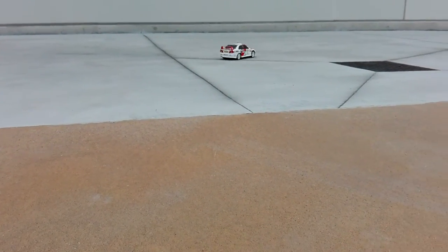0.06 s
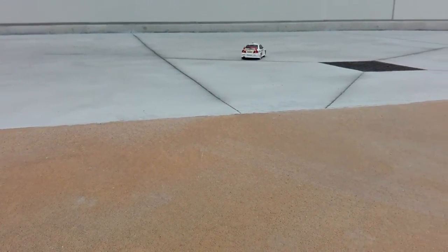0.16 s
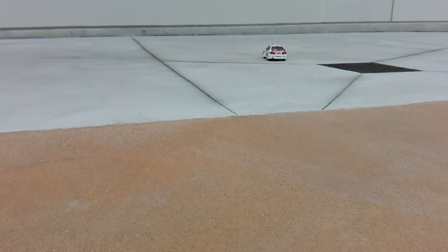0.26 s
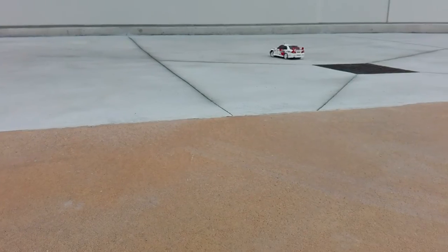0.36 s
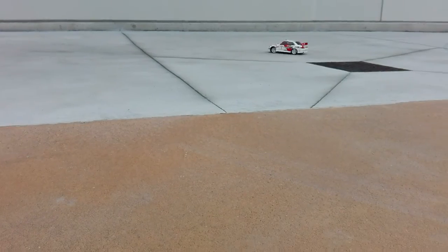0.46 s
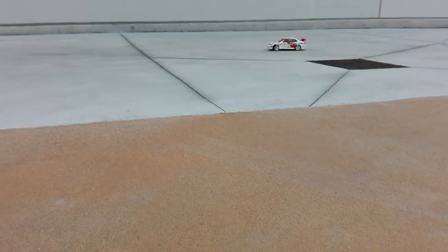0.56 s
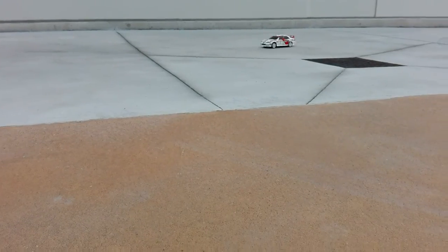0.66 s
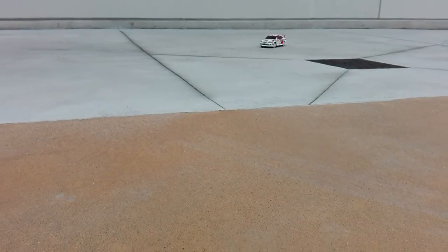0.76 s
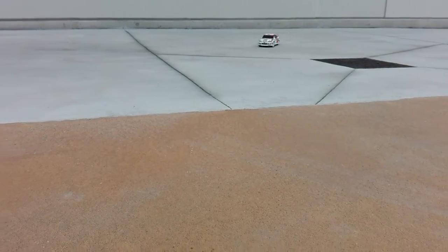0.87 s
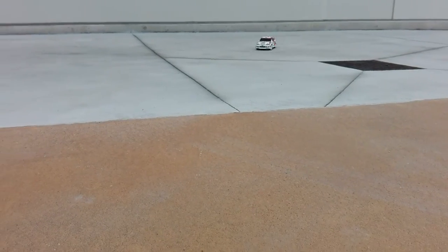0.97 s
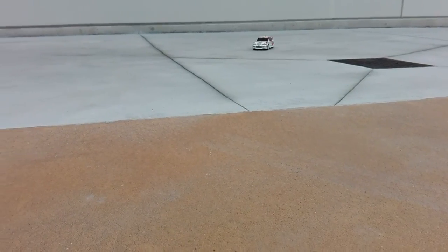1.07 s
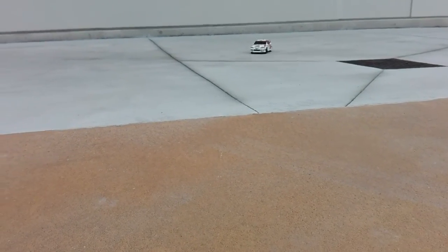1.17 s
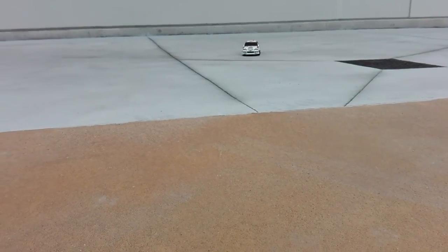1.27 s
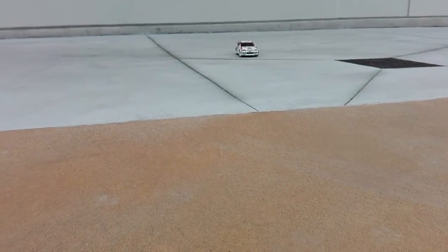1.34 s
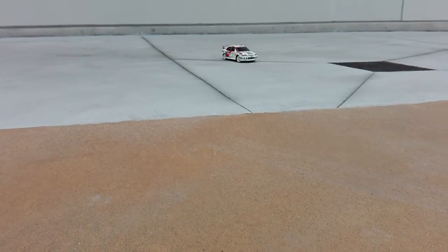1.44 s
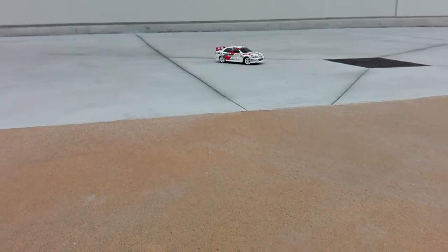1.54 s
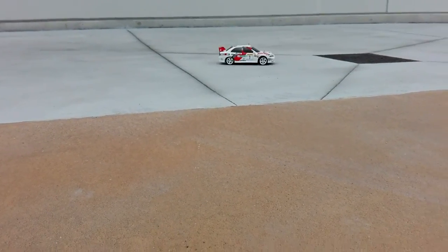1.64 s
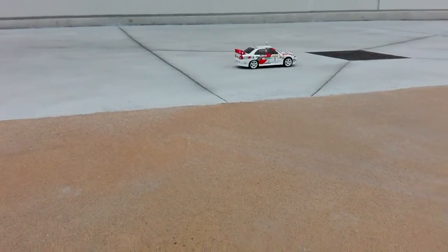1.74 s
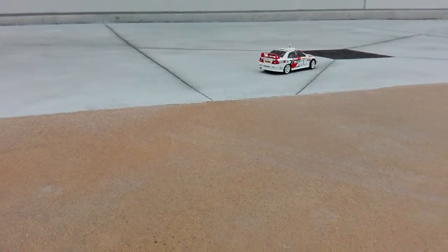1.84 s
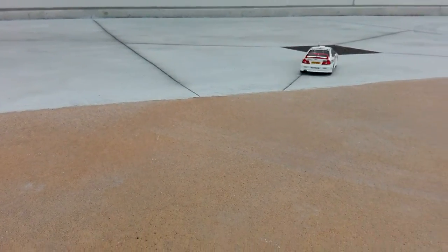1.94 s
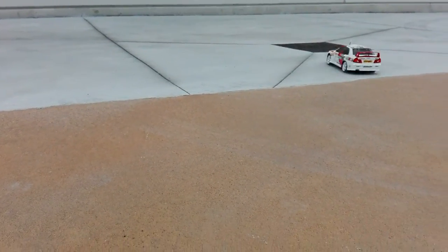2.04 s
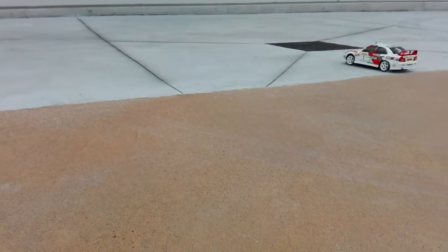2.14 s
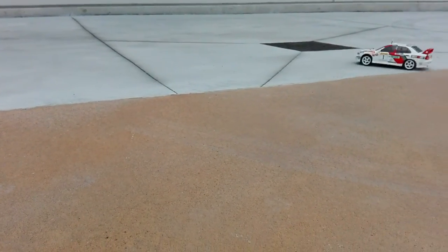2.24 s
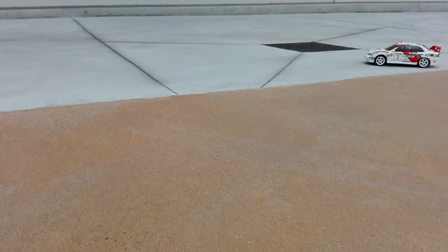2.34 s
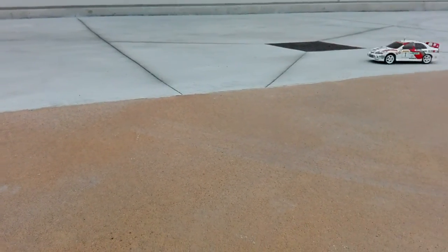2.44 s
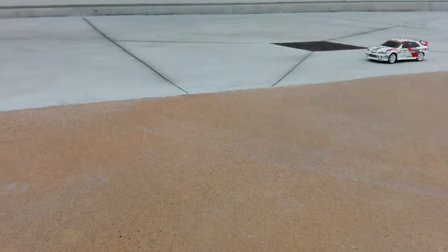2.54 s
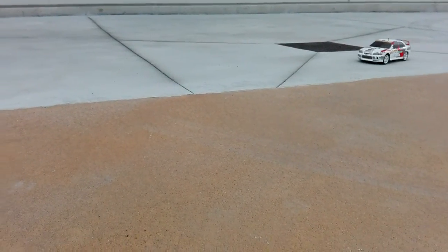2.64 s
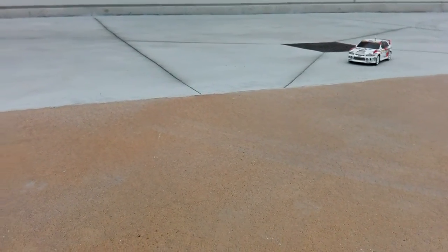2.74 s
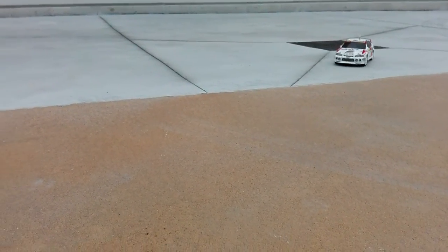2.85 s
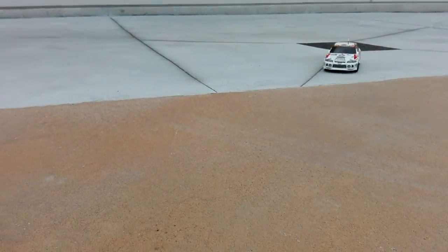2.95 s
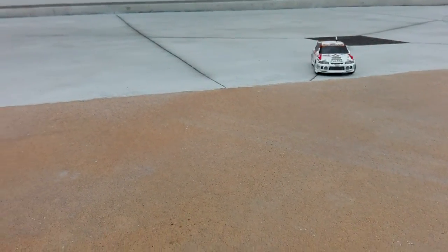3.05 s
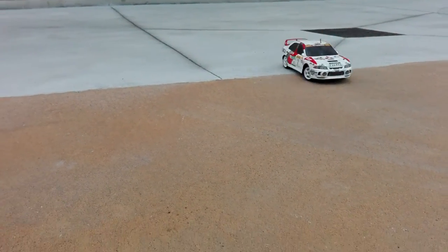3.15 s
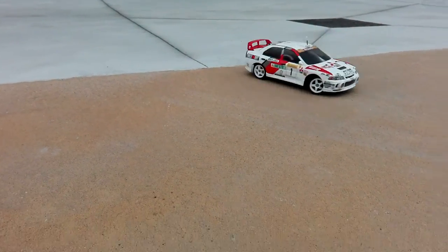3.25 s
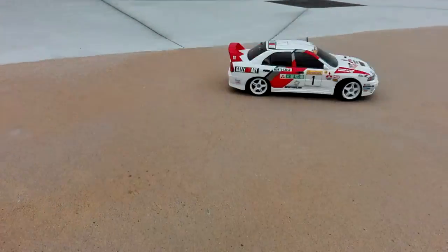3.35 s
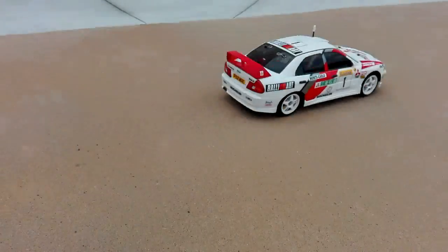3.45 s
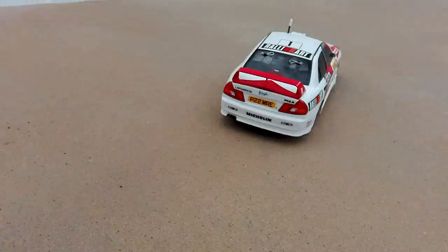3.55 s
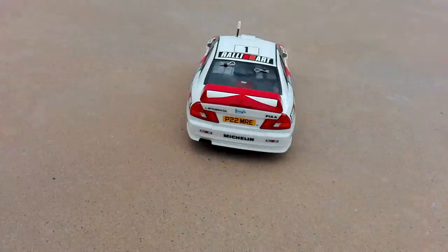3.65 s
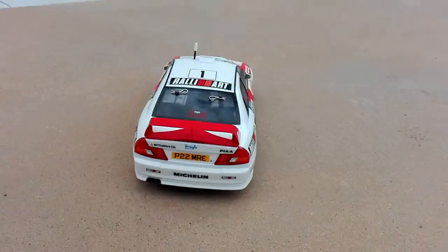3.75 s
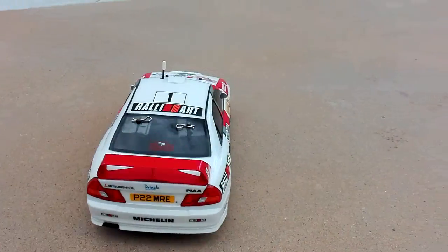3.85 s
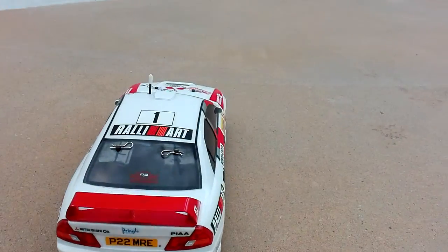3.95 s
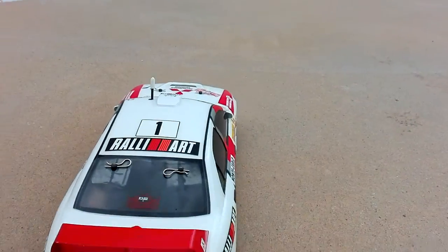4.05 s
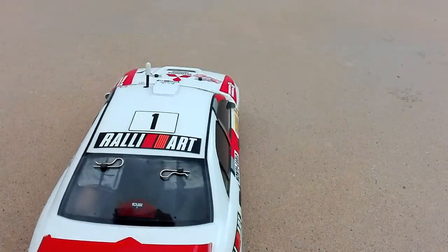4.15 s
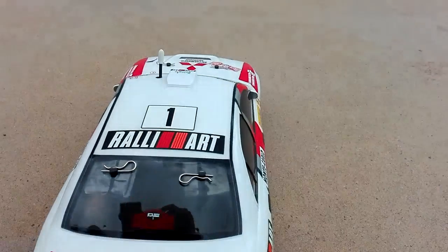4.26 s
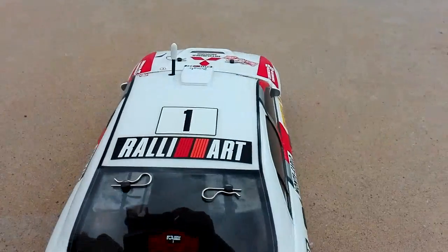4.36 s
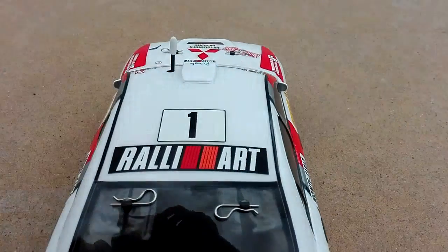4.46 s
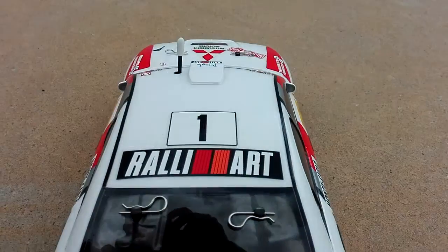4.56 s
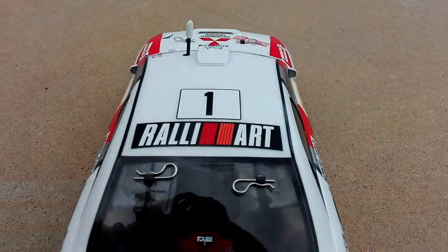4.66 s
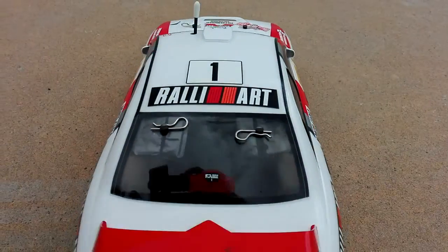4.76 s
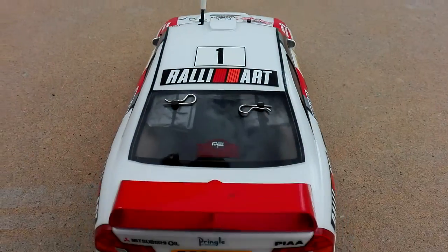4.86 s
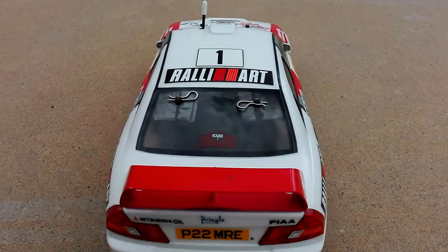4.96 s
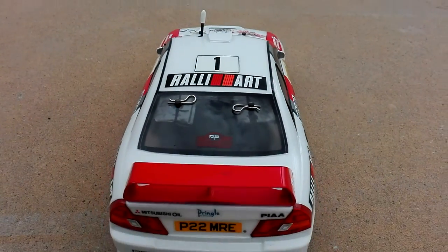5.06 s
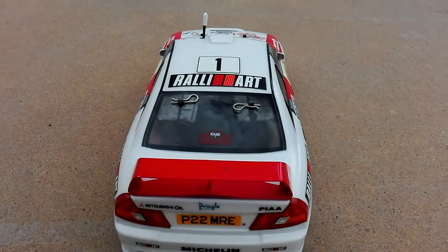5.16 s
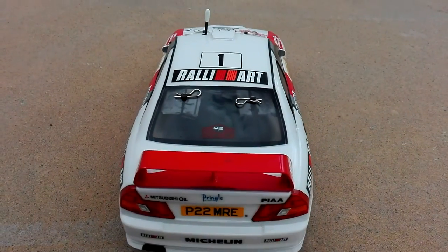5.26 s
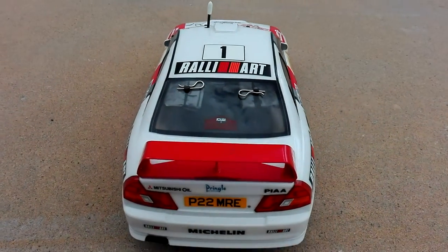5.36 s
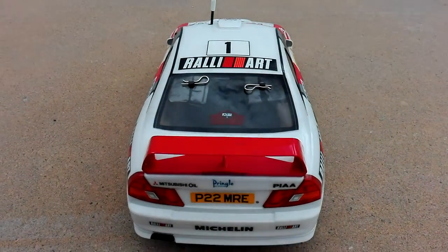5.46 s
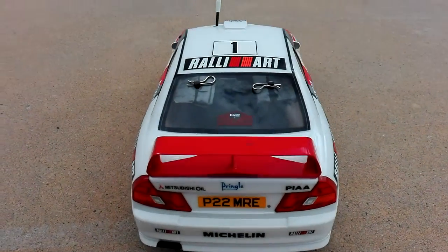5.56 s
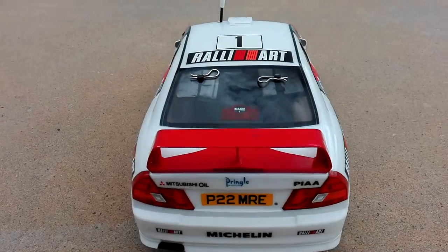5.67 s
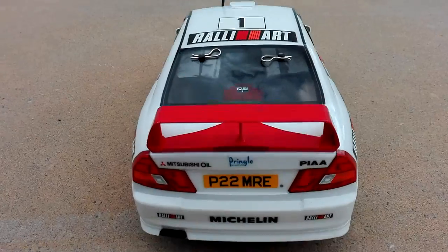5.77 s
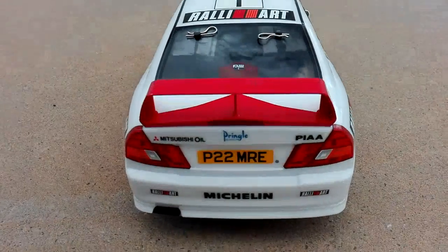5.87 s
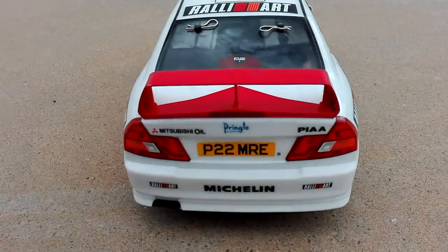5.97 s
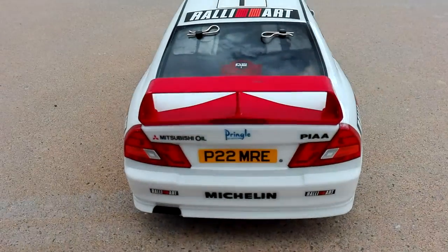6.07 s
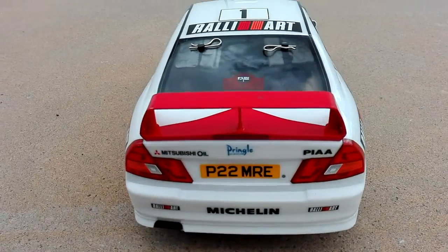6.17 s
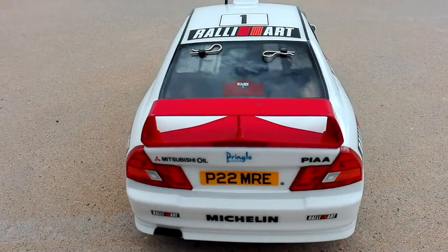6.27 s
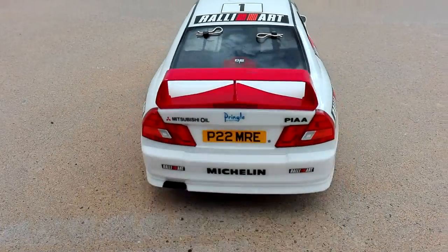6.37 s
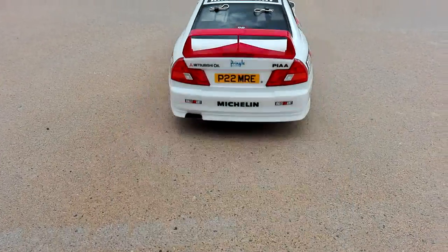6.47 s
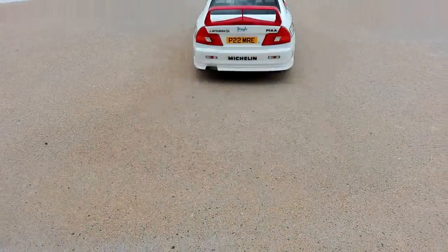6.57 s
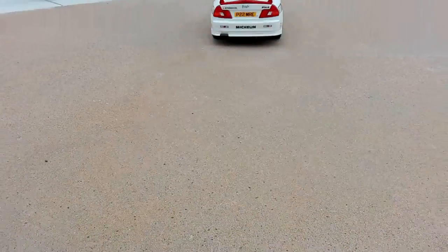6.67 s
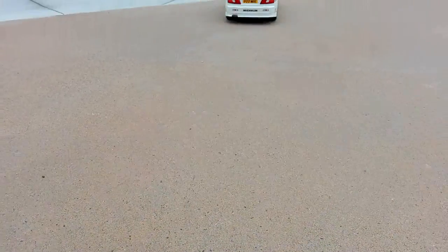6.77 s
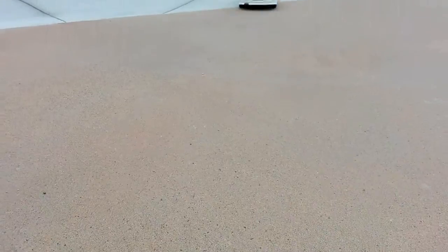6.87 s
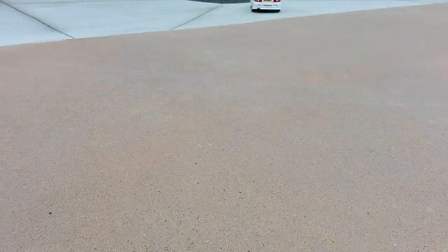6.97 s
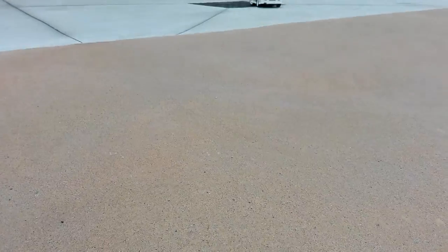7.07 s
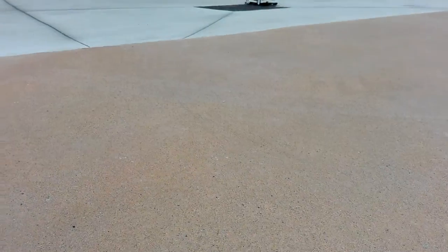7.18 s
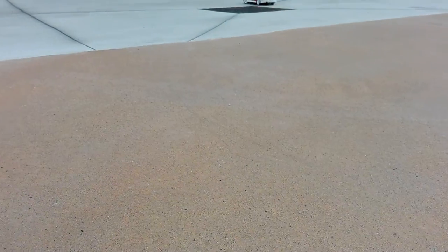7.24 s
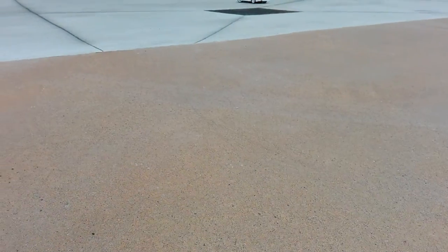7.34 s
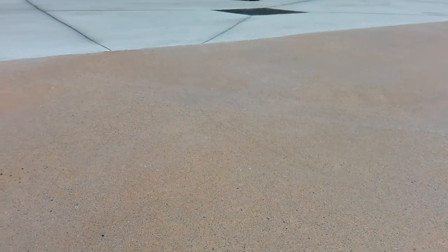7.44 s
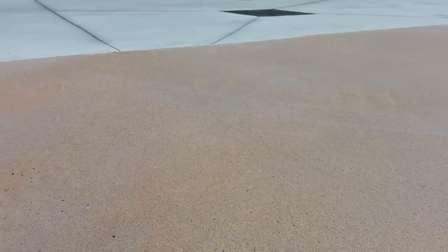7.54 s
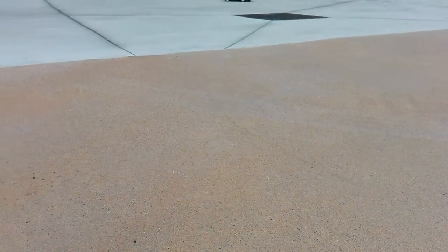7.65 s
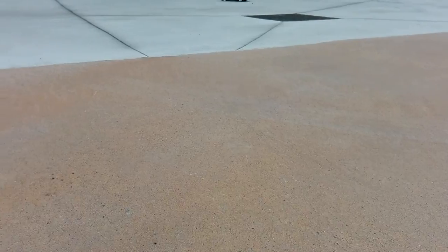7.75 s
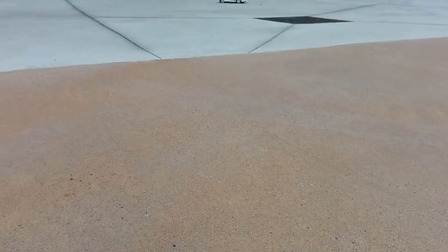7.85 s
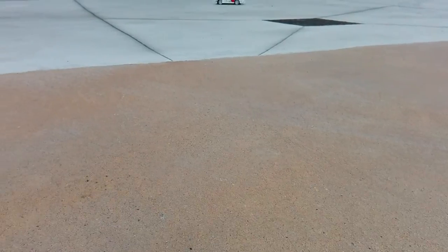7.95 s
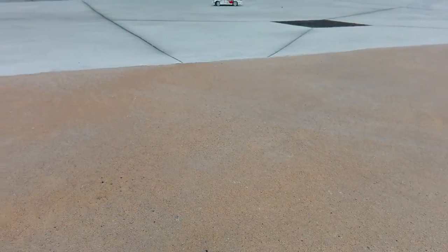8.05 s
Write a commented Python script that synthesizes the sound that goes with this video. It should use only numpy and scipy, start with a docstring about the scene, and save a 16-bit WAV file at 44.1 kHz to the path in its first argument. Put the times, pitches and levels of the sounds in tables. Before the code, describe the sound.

A small electric radio-controlled car circles on concrete outdoors, its tyres hissing and its gears whining roughly with each burst of throttle. It rolls up to the microphone and stops. The steering servo whirrs twice with a knock, and a thin, high whistle comes and goes. The car then speeds away with a rising whine, clacks over a joint and coasts. Light wind rumbles on the microphone.

```python
"""A small electric radio-controlled car circles on a concrete yard, in light wind that rumbles on the microphone.
Its tyres roar through the plastic shell; its gears whine roughly at each squeeze of the throttle.
It rolls up close and stops near 4.3 s. The steering servo whirrs twice among faint squeaks, and the
speed controller whistles. From 6.4 s the car speeds away, clacks over a joint at 7.2 s and coasts."""
import sys
import numpy as np
from scipy import signal
from scipy.fft import rfft, irfft, next_fast_len
from scipy.io import wavfile

SR = 44100
rng = np.random.default_rng(int(sys.argv[2]) if len(sys.argv) > 2 else 0)


def to_wav(sig):
    """Store sig (one row per channel, or 1-D mono) as 16-bit WAV at the path in sys.argv[1].

    Samples outside -1..1 are clipped; the rate is SR.
    """
    pcm = np.clip(np.atleast_2d(sig), -1, 1) * 32767
    pcm = np.round(pcm).astype(np.int16)
    wavfile.write(sys.argv[1], SR, pcm.T)  # frames by channels


N = 357651
T = np.arange(N) / SR
FFT_SIZE = next_fast_len(N)
BIN_HZ = np.fft.rfftfreq(FFT_SIZE, 1 / SR)

# noise spectra: f/Hz, relative density/dB
AIR_SPECTRUM = [(88, -0.5), (150, -4.5), (535, -23), (876, -14.5), (1460, -13), (2440, -24), (6680, -36),
                (8070, -32), (8550, -37.5), (14000, -39)]  # distant outdoor wash
WIND_SPECTRUM = [(8, -21), (18, 9), (38, 0.5), (70, 1), (115, -8), (155, -27), (260, -37), (600, -93)]
BUFFET_SPECTRUM = [(60, -15), (120, 8), (200, -2.5), (330, -15.5), (600, -22.5), (1500, -66)]  # hard gusts at the microphone port
SCRAPE_SPECTRUM = [(250, 2.5), (330, -10), (420, 5), (540, -5.5), (1250, -3), (1480, 8.5), (1650, -5),
                   (1900, 1.5), (2250, -2.5), (6000, -25)]
TICK_SPECTRUM = [(500, -34), (2000, 7), (3500, 11), (5300, 12), (7000, 7.5), (9000, -2), (14000, -16)]
CLACK_SPECTRUM = [(200, -2.5), (900, -6), (1900, 9.5), (2800, 1.5), (4200, 5.5), (5400, 13), (6400, 4),
                  (8000, 8), (10000, -1), (14000, -13)]
JOLT_SPECTRUM = [(88, -93), (150, -24), (300, -7.5), (410, 5), (600, -6.5), (1140, -8.5), (1490, 7),
                 (2350, -14), (2690, -1), (3010, -17), (3310, -3), (4570, -18), (5220, 0), (5850, -38),
                 (6550, -4), (7070, -19), (14000, -28)]
SLACK_SPECTRUM = [(300, -33), (900, -16.5), (1150, 2), (1300, -2), (1550, -1), (2000, -19), (3000, -32),
                  (9000, -30)]
SERVO_SPECTRUM = [(250, -20), (420, 7.5), (600, -51), (1250, -8), (1600, -3), (2100, -16), (2600, 5),
                  (3000, 3), (3900, -8), (4700, 5), (7500, 6), (9000, -2.5), (14000, -10.5)]
ROAR_SPECTRUM = [(150, -89), (400, -15), (720, -21), (850, -3.5), (1150, 1.5), (1700, 1), (2150, -1.5),
                 (2480, -8), (2900, -9.5), (3300, -8), (5000, -11), (9000, -27), (14000, -30)]
GRIT_SPECTRUM = [(1500, -31.5), (2400, -1.5), (2850, -4), (3200, 2.5), (4300, 3), (5100, 0), (6000, 3.5),
                 (7400, 2.5), (8500, -4.5), (10500, -17.5), (14000, -33)]
BOOM_SPECTRUM = [(100, -24), (255, 5.5), (340, -0.5), (450, 2), (700, 4.5), (1000, 1.5), (2000, -42)]
SPRAY_SPECTRUM = [(4000, -31), (8000, 5.5), (10000, 5.5), (12000, 2.5), (14500, -2.5)]

# responses: f/Hz, gain/dB
SIDE_RESPONSE = [(100, -69), (2600, -76), (3600, -104), (5000, -34), (8000, -8), (13000, -5.5)]  # stereo side signal
GROUND_RESPONSE = [(400, 0), (620, 5), (900, 1), (2080, 7), (2420, -5.5), (2880, -7.5), (3150, -4),
                   (4400, -1), (5200, 2), (6200, -6.5), (7300, 0)]  # reflection off the paving
GEAR_CASE_RESPONSE = [(900, -31), (1600, -2), (2500, 1), (3300, 11), (4300, -3), (5400, -9), (6300, -2),
                      (7400, 9), (8300, 6.5), (9500, 0.5), (13000, -13)]
WHEEL_RESPONSE = [(200, -12), (400, -11.5), (520, -11.5), (700, -15.5), (840, -3), (1100, -5), (1350, -1.5),
                  (1700, -3)]  # hollow wheels
FAST_RESPONSE = [(600, 0.5), (740, -2.5), (850, -8), (1030, 7), (1170, 0.5), (1350, 1.5)]  # roar at speed

# wind puffs: t/s, rumble/dB, buffet/dB, half length/s
PUFFS = [(0.097, -43.5, -80, 0.065), (.3, -40, -70, 0.047), (0.46, -45, -76, 0.093),
         (1.13, -50.5, -60.5, 0.051), (1.636, -37.5, -54.5, 0.074), (2.09, -46, -80, 0.35),
         (2.53, -44, -80, 0.085), (3.749, -46, -63, 0.23), (4.363, -48, -61, 0.035),
         (4.74, -47.5, -48.5, 0.075), (6.93, -38.5, -61, 0.16), (7.258, -38, -47, 0.071),
         (7.55, -41, -64, 0.25), (7.78, -36, -50, 0.048), (7.956, -34, -46, 0.15)]
# car to microphone: t/s, distance/m
DISTANCE_M = [(0, 5.9), (1.2, 4.1), (2.0, 5.3), (2.7, 2.8), (3.2, 2.3), (3.55, 0.81), (4.2, 0.4),
              (5.3, 0.51), (6.45, 0.37), (7, 1.38), (8.1, 1.21)]
# road speed as gear mesh pitch: t/s, f/Hz
LAP_MESH_HZ = [(0, 3910), (.3, 4202), (.42, 4080), (.5, 3563), (.8, 3394), (.92, 3450), (1.1, 3737),
               (1.38, 3626), (1.63, 4530), (1.73, 4200), (1.87, 4276), (2.03, 3910), (2.15, 4040),
               (2.45, 3968), (2.6, 3828), (2.9, 3862), (3.03, 4346), (3.22, 4642), (3.71, 4100),
               (3.745, 1708), (4.3, 1392)]
SPRINT_MESH_HZ = [(6.349, 497), (6.54, 1216), (6.61, 1625), (6.71, 2303), (6.8, 3300), (6.84, 3588),
                  (6.866, 4047), (6.935, 4156), (6.985, 4976), (7.034, 6820), (7.09, 4550), (7.198, 3702),
                  (8.1, 3440)]
# rolling noise: t/s, level/dB, treble/dB
LAP_ROLL_DB = [(0, -38.5, -40), (.3, -42.5, -42), (0.752, -43.5, -43.5), (1.1, -47.5, -48.5),
               (1.4, -45, -47), (1.63, -37, -40), (1.97, -35.5, -35), (2.1, -38, -40.5), (2.62, -37.5, -39),
               (2.8, -40.5, -44), (2.93, -40, -40), (3.06, -38.5, -42.5), (3.23, -36, -39),
               (3.32, -30, -35), (3.37, -28.5, -36.5), (3.43, -34, -39), (3.52, -35.5, -40.5),
               (3.601, -44, -42), (3.7, -50, -47), (3.74, -60, -70), (4.15, -64, -69), (4.349, -65.5, -106)]
SPRINT_ROLL_DB = [(6.331, -79, -73.5), (6.46, -45.5, -47.5), (6.76, -33.5, -35.5), (7.04, -33.5, -38),
                  (7.14, -43, -45.5), (7.2, -36.5, -43.5), (7.329, -41, -48), (7.7, -50.5, -52),
                  (8.1, -58.5, -62)]
# dust spray from the tyres: t/s, level/dB
SPRAY_DB = [(0, -56), (1.38, -60.5), (2.03, -50.5), (3.68, -52), (3.78, -100), (6.35, -105), (6.8, -46),
            (7.3, -63), (7.68, -63), (8.1, -106)]
# shell resonances: f/Hz, width/Hz, gain/dB
SHELL_MODES = [(863, 93, 6), (1143, 334, 3), (1480, 160, 0), (1667, 144, -2.5), (1954, 280, -3),
               (3250, 2000, 5.5), (5126, 470, 5.5)]

# impacts: t/s, level/dB, t60/s
GRIT_TICKS = [(.62, -31, 0.04), (1.57, -32, 0.029), (3.871, -54, 0.043), (3.954, -43, 0.0097),
              (3.962, -54, 0.092), (4.171, -50, 0.012), (5.113, -55, 0.036), (5.143, -61, 0.18),
              (5.437, -58.5, 0.16), (5.885, -59, 0.092), (5.92, -64, 0.22), (6.134, -54, 0.017),
              (6.507, -33.5, 0.028)]  # grit cracks under the tyres
CHASSIS_CLACKS = [(7.2287, -14.5, 0.013), (7.233, -26.5, 0.061), (7.256, -32, 0.027), (7.295, -35, 0.092)]  # over a joint
STEERING_JOLTS = [(4.592, -47.5, 0.23), (4.617, -37.5, 0.15), (4.651, -27.5, 0.078), (4.668, -19.5, 0.046),
                  (4.69, -42, 0.28), (4.845, -43, 0.0099)]  # front tyres slip and jolt the shell
SLACK_KNOCKS = [(2.568, -30.5, .12), (2.852, -29, 0.066), (3.257, -29, 0.1), (3.712, -39, 0.11)]  # gear slack shuts on throttle change or braking
# low hollow thumps: t/s, level/dB
THUMPS = [(0.306, -32), (1.15, -32.5), (2.99, -33), (4.301, -46), (4.641, -37.5), (6.984, -30)]
# modes of a thump: f/Hz, level/dB, t60/s
THUMP_MODES = [(242, -3.5, 0.091), (413, -18, 0.04), (590, -11.5, 0.018), (794, -9.5, 0.047)]

# swells: t/s, level/dB, rise/s, fall/s
SCRAPES = [(4.22, -60, 0.17, 0.43), (4.52, -55, 0.067, 0.036), (4.83, -62, 0.15, 0.25),
           (5.08, -61, 0.34, 0.21)]  # drive train, braking and turning slowly
WHISTLES = [(3.85, -90, 0.095, .22), (4.56, -51, 0.033, 0.017), (4.76, -56.5, 0.2, 0.025),
            (5.5, -64, .04, 0.11), (5.62, -55.5, 0.018, 0.056), (5.8, -58, 0.14, 0.16),
            (6.14, -75, 0.22, 0.22), (6.44, -54.5, 0.13, 0.43)]  # touches of low throttle
TURN_HUMS = [(1.04, -62, 0.098, 0.079), (1.53, -51.5, 0.065, 0.1), (3.16, -54.5, 0.18, 0.27)]  # slow shaft in tight turns
# brief drive train tones: t/s, level/dB, half length/s, f/Hz, width/Hz
DRIVE_TONES = [(0.196, -40.5, 0.12, 1025, 24.5), (1.221, -54, 0.29, 1690, 30),
               (3.12, -46.5, 0.16, 1690, 35), (3.613, -50, .014, 2712, 110), (4.173, -65, 0.11, 1948, 55),
               (4.40, -51, 0.033, 1706, 110), (4.5, -51, 0.058, 1665, 120), (4.85, -54, 0.066, 1627, 150),
               (5.046, -64, 0.067, 3730, 100)]

# servo moves: start/s, length/s, level/dB
SERVO_MOVES = [(4.346, .215, -39.5), (4.581, 0.19, -39.5)]
# servo gear stage tones: pitch multiple, width/Hz, level/dB
SERVO_TONES = [(1, 50, -5), (1.5, 95, -11), (1.75, 110, -12), (2, 120, -9), (2.5, 130, -11), (3, 150, -9)]
# motor pulling: start/s, length/s
POWERED = [(-.1, 3.4), (6.41, 0.687)]
# throttle squeezes: start/s, length/s, mesh/dB, octave/dB (re rolling noise, ahead of the gear case)
THROTTLE = [(-.05, 0.41, -5.5, -17), (0.466, 0.16, -9.5, -12), (0.725, 0.22, -7, -21),
            (1.003, 0.52, -9, -16), (1.672, 0.21, -6, -19.5), (2.111, 0.38, -7.5, -12),
            (2.603, 0.19, -11, -14.5), (2.94, 0.24, -6, -16.5), (3.648, 0.051, -14, -17),
            (6.561, 0.066, -2.5, -8), (6.767, 0.12, -6, -8.5), (6.943, 0.035, -2, -16)]
# clear bursts of mesh tone: t/s, level/dB, half length/s
CHATTERS = [(0.489, -41, 0.0079), (0.53, -34.5, 0.021), (.635, -40.5, .022), (0.778, -41.5, 0.021),
            (0.871, -34, .014), (1.385, -43.5, .018), (3.69, -46.5, 0.019), (6.55, -47, .025),
            (6.7, -38, .018), (6.762, -35, .018), (6.85, -37, 0.022), (6.981, -44, .015)]


def amp(db):
    return 10 ** (np.asarray(db) / 20)


def unit_rms(x):
    return x / np.sqrt(np.mean(abs(x) ** 2) + 1e-20)


def curve_db(points, hz):
    point_hz, point_db = np.transpose(points)
    return np.interp(np.log(hz + 1), np.log(point_hz + 1), point_db)


def filtered(x, points, extra_db=0):
    return irfft(rfft(x, FFT_SIZE) * amp(curve_db(points, BIN_HZ) + extra_db), FFT_SIZE)[:N]


def colour(x, points, extra_db=0):
    return unit_rms(filtered(x, points, extra_db))


def follow(rows):
    return np.interp(T, *np.transpose(rows))


def wander(rate_hz, size=32768):
    """Smooth random control, rms 1."""
    hz = np.fft.rfftfreq(size, T[-1] / size)
    slow = irfft(rfft(rng.standard_normal(size)) * np.exp(-.5 * (hz / rate_hz) ** 2), size)
    return unit_rms(np.interp(T, np.linspace(0, T[-1], size), slow))


def flicker(depth_db, rate_hz):
    return amp(depth_db * wander(rate_hz))


def grains(per_s, spread_db):
    """Random clicks of uneven size."""
    size = amp(spread_db * np.minimum(rng.exponential(1, N), 4))
    return unit_rms(size * rng.standard_normal(N) * (rng.random(N) < per_s / SR))


def fuzzy_tone(turns, width_hz):
    """Narrow noise band around a running phase."""
    phase = 2 * np.pi * turns
    return unit_rms(wander(width_hz) * np.cos(phase) + wander(width_hz) * np.sin(phase))


def rough_rotor(turns, size):
    """Random surface that repeats once a turn."""
    surface = signal.resample(rng.standard_normal(size), size * 8)
    return unit_rms(np.interp(turns % 1, np.arange(len(surface)) / len(surface), surface, period=1))


def swells(rows):
    """Power sum of Gaussian envelopes."""
    return np.sqrt(sum((amp(db) * np.exp(-((T - s) / np.where(T < s, rise, fall)) ** 2)) ** 2
                       for s, db, rise, fall in rows))


def squeeze(start_s, length_s, on_s=0.028, off_s=0.11):
    """Gear load, 0-1: rise, hold, release."""
    return np.clip(np.minimum((T - start_s) / on_s, 1 - (T - start_s - length_s) / off_s), 0, 1)


def rolling(treble=False):
    """Rolling noise gain; zero between laps and sprint."""
    gain = np.zeros(N)
    for run in np.array(LAP_ROLL_DB), np.array(SPRINT_ROLL_DB):
        moving = (T > run[0, 0] - .05) & (T < run[-1, 0] + .05)
        gain += amp(np.interp(T, run[:, 0], run[:, 2 if treble else 1])) * moving
    return gain


def outdoors(breeze_db=-56, wash_db=-61):
    """Wind rumbles and tears at the microphone port, over a steady distant wash."""
    gust = np.hypot(amp(breeze_db), swells([(s, db, half, half) for s, db, _, half in PUFFS]))
    tearing = swells([(s, db, half, half) for s, _, db, half in PUFFS])
    rumble = colour(rng.standard_normal(N), WIND_SPECTRUM) * gust * flicker(2.5, 7.9)
    buffet = colour(rng.standard_normal(N), BUFFET_SPECTRUM) * tearing * flicker(3, 9.1)
    wash = colour(rng.standard_normal(N), AIR_SPECTRUM) * amp(wash_db)
    return rumble + buffet + wash


def ground_scatter(x):
    """Scatter makes the treble differ between the ears."""
    side = filtered(x * wander(89), SIDE_RESPONSE)
    return np.array([x + side, x - side])


def ground_reflection(x, from_m=3.7, full_m=6.3):
    """The reflection hollows the sound, more so with distance."""
    far = np.interp(follow(DISTANCE_M), [from_m, full_m], [0, 1])
    return (1 - far) * x + far * filtered(x, GROUND_RESPONSE)


def drive_tones(sag_per_s=0.11):
    """Brief, slightly falling tones: a ringing gear hum near 1 kHz, then creaks and squeaks."""
    tones = np.zeros(N)
    for s, db, half, hz, width in DRIVE_TONES:
        turns = np.cumsum(hz * (1 - sag_per_s * (T - s))) / SR
        tones += fuzzy_tone(turns, width) * swells([(s, db, half, half)])
    return tones * flicker(3, 50)


def creep(crunch_db_at_1m=-87):
    """Single grains crunch, louder when near; the slow drive train scrapes."""
    crunch = colour(grains(550, 2.0), TICK_SPECTRUM) * amp(crunch_db_at_1m) / follow(DISTANCE_M)
    scrape = colour(grains(2500, 2.5), SCRAPE_SPECTRUM) * swells(SCRAPES) * flicker(3, 14)
    return crunch + scrape


def thumps():
    """Low hollow thumps, while rolling and at the stop."""
    t = T[:SR // 2]
    thud = sum(amp(db - 60 * t / t60) * np.sin(2 * np.pi * hz * t) for hz, db, t60 in THUMP_MODES)
    blows = np.zeros(N)
    for s, db in THUMPS:
        blows[round(s * SR)] = amp(db)
    return signal.oaconvolve(blows, thud)[:N]


def impacts(rows, spectrum):
    """Each blow is a dying noise burst, rung through a minimum-phase filter."""
    envelope = np.zeros(N)
    for s, db, t60 in rows:
        tail = envelope[round(s * SR):][:SR // 2]
        tail += amp(db - 60 * T[:len(tail)] / t60)
    gain_db = np.maximum(curve_db(spectrum, abs(np.fft.fftfreq(2048, 1 / SR))), -90)
    log_response = np.conj(signal.hilbert(np.log(amp(gain_db))))
    ring = np.fft.ifft(np.exp(log_response)).real
    return signal.oaconvolve(envelope * rng.standard_normal(N), ring / np.linalg.norm(ring))[:N]


def controller(whistle_hz=7807):
    """Chopped current makes the windings sing; turning brushes break the tone up."""
    turning = np.interp(T, [6.25, 6.4], [0, 1])
    turns = np.cumsum(whistle_hz + 4 * wander(30)) / SR
    clear = np.sqrt(2 - 2 * turning) * np.sin(2 * np.pi * turns)
    broken = np.sqrt(turning) * fuzzy_tone(turns, 73.6)
    return (clear + broken) * swells(WHISTLES) * flicker(1, 25)


def servo(top_hz=2650, top_at=0.51, sag=3.2, ends_db=-38):
    """A tiny gearbox spins up and down, buzzing and rattling; its mesh tones grow through each move."""
    pitch_hz, gain, squeal = np.full(N, top_hz / 2), np.zeros(N), np.ones(N)
    for start, length, db in SERVO_MOVES:
        on = (T >= start) & (T < start + length)
        progress = (T[on] - start) / length
        pitch_hz[on] = top_hz * (1 - sag * (progress - top_at) ** 2)
        gain[on] = amp(db + ends_db * abs(2 * progress - 1) ** 3.03)
        squeal[on] = np.interp(progress, [0, 1], [0.3, 1.36])
    turns = np.cumsum(pitch_hz * (1 + 0.013 * wander(60.9))) / SR
    teeth = sum(amp(db) * fuzzy_tone(multiple * turns, width) for multiple, width, db in SERVO_TONES)
    buzz = .8 * rough_rotor(turns / 4 + .09 * wander(90), size=40)
    rattle = .7 * grains(9800, .8)
    return colour(squeal * teeth + buzz + rattle, SERVO_SPECTRUM) * gain * flicker(1.7, 110)


def chatter(mesh_turns):
    """The teeth briefly bite evenly and the mesh tone rings clear."""
    rough = fuzzy_tone(mesh_turns, 55)
    clear = unit_rms(np.sin(2 * np.pi * (mesh_turns + .12 * wander(60))))
    bursts = swells([(s, db, half, half) for s, db, half in CHATTERS])
    return unit_rms((rough + clear) * flicker(-0.5, 60)) * bursts


def ground_bounce(x, share=0.35, delay_s=0.00125, sway=0.231):
    """A bounce off the ground under the moving car cancels and lifts tones by turns."""
    echo = np.interp(T - delay_s * (1 + sway * wander(9.1)), T, x)
    return (x + share * echo) / np.hypot(1, share)


def gear_whine(mesh_turns, speed, load, coast_mesh_db=-12, coast_octave_db=-22.5):
    """Mesh tone and octave in a rasp of loose teeth, louder under throttle."""
    coast_mesh, coast_octave = amp(coast_mesh_db), amp(coast_octave_db)
    mesh_gain, octave_gain = np.full(N, coast_mesh), np.full(N, coast_octave)
    for start, length, mesh_db, octave_db in THROTTLE:
        mesh_gain += (amp(mesh_db) - coast_mesh) * squeeze(start, length)
        octave_gain += (amp(octave_db) - coast_octave) * squeeze(start, length)
    loose_turns = mesh_turns + 0.26 * speed ** 1.5 * wander(48)
    bite = load / np.maximum(speed, 1) ** 3  # racing teeth lose their clear tone
    mesh = .85 * bite * fuzzy_tone(mesh_turns, 65) + fuzzy_tone(loose_turns, 210)
    octave = .3 * bite * fuzzy_tone(2 * mesh_turns, 100) + fuzzy_tone(2 * loose_turns, 320)
    mesh = unit_rms(mesh * flicker(2.5, 24)) * mesh_gain
    octave = unit_rms(octave * flicker(2.5, 26)) * octave_gain
    return filtered(ground_bounce((mesh + octave) * rolling()), GEAR_CASE_RESPONSE)


def shaft_hum(mesh_turns, speed, load, slow_ratio=8.7, idler_ratio=4.19):
    """Two shafts hum through the wheels under load; the slow one swells in tight turns."""
    slow = fuzzy_tone(mesh_turns / slow_ratio, 15.6) * speed ** 0.26 * amp(-15)
    idler = fuzzy_tone(mesh_turns / idler_ratio, 50) * amp(-3)
    cornering = fuzzy_tone(mesh_turns / slow_ratio, 13) * swells(TURN_HUMS)
    return filtered((slow + idler) * load * rolling(), WHEEL_RESPONSE) + cornering


def shell_ring(ring_db=-7):
    """The middle shell resonances flare up independently."""
    rings = sum(amp(db) * flicker(3.5, 3.1) * fuzzy_tone(hz * T, width / 3)
                for hz, width, db in SHELL_MODES[1:5])
    return unit_rms(rings) * rolling() * amp(ring_db)


def fast_roar(x, mesh_hz, above_hz=4300):
    """Above a set road speed the low edge of the roar steps up."""
    return np.where(mesh_hz > above_hz, filtered(x, FAST_RESPONSE), x)


def tyres(mesh_turns, roar_db=-2.5, boom_db=-16, motor_ratio=26.1):
    """Rubber drums on concrete grains, with a drone from each motor turn; the shell booms when near."""
    shell_db = sum(db / (1 + (2 * (BIN_HZ - hz) / width) ** 2) for hz, width, db in SHELL_MODES)
    roll, distance_m = rolling(), follow(DISTANCE_M)
    motor_turns = mesh_turns / motor_ratio + .012 * wander(25)
    drone = 0.54 * rough_rotor(motor_turns, size=120) / distance_m ** 0.14
    roar = colour(grains(7000, 0.91) + drone, ROAR_SPECTRUM, shell_db)
    roar *= roll * amp(roar_db) * flicker(2, 10)
    grit = colour(grains(12000, 0.6), GRIT_SPECTRUM, shell_db) * rolling(treble=True)
    boom = colour(rng.standard_normal(N), BOOM_SPECTRUM) * roll * amp(boom_db) / distance_m ** 1.09
    spray = colour(grains(16000, 0.41), SPRAY_SPECTRUM) * amp(follow(SPRAY_DB))
    return (roar + grit + boom + spray) * flicker(1, 27)


def scene(cruise_hz=4000, coast_load_db=-14):
    """One road speed drives tyres and gears; steering, knocks, wind and whistle join them."""
    mesh_hz = follow(LAP_MESH_HZ + SPRINT_MESH_HZ) * (1 + .007 * wander(14.51))
    mesh_turns, speed = np.cumsum(mesh_hz) / SR, mesh_hz / cruise_hz
    load = np.maximum(sum(squeeze(*row) for row in POWERED), amp(coast_load_db))
    roar = fast_roar(ground_reflection(tyres(mesh_turns)) + shell_ring(), mesh_hz)
    gears = gear_whine(mesh_turns, speed, load) + shaft_hum(mesh_turns, speed, load)
    car = roar + gears + chatter(mesh_turns) + servo() + creep() + drive_tones()
    knocks = impacts(CHASSIS_CLACKS, CLACK_SPECTRUM) + impacts(GRIT_TICKS, TICK_SPECTRUM)
    knocks += impacts(STEERING_JOLTS, JOLT_SPECTRUM) + impacts(SLACK_KNOCKS, SLACK_SPECTRUM)
    return ground_scatter(car + knocks + thumps() + outdoors()) + controller()


def record(dry):
    """Low-pass at 14.4 kHz."""
    lowpass = signal.firwin(511, 14400, window=("kaiser", 9), fs=SR)
    return signal.oaconvolve(dry, lowpass[None], "same")


dry = scene()
out = record(dry)
to_wav(out)
```